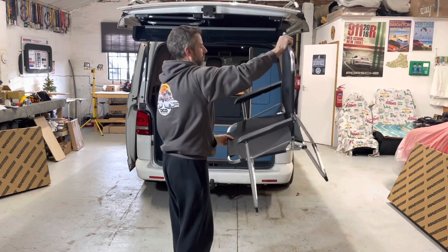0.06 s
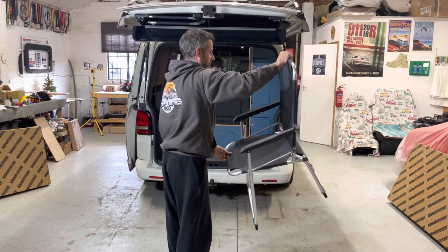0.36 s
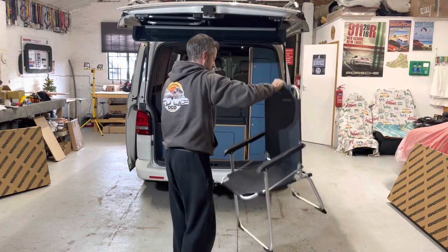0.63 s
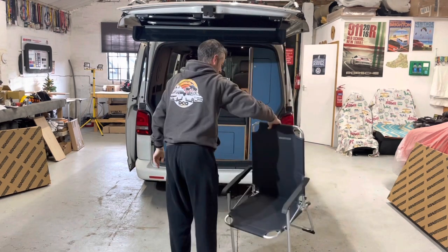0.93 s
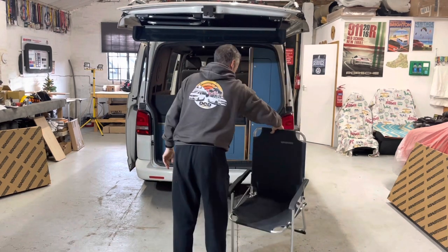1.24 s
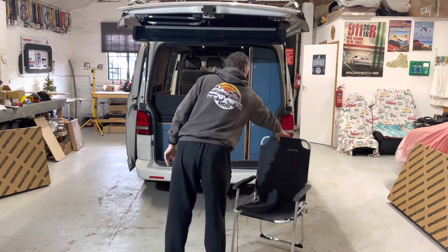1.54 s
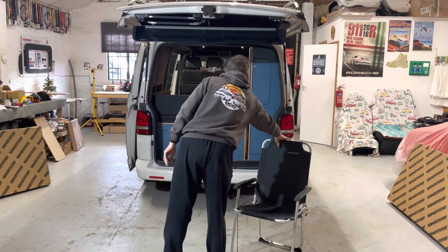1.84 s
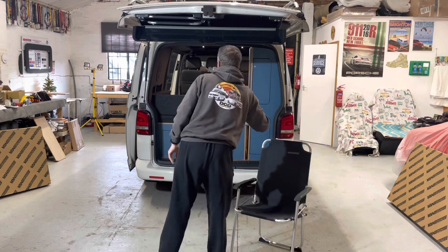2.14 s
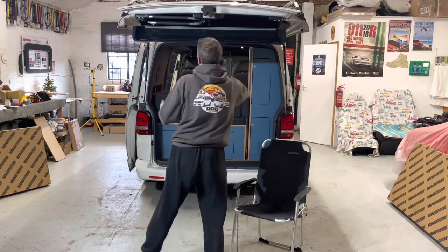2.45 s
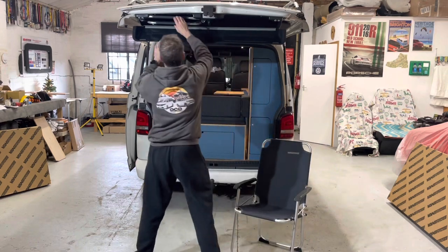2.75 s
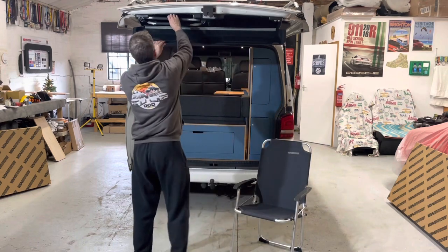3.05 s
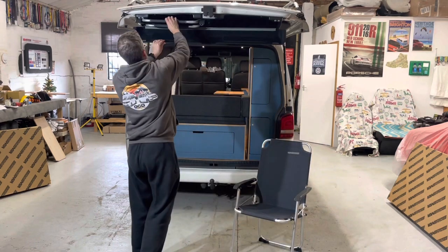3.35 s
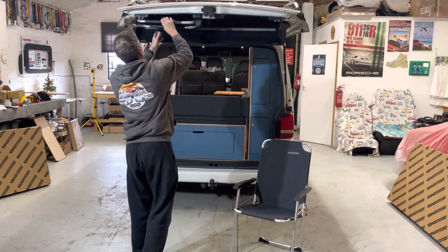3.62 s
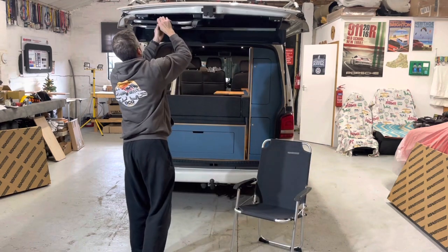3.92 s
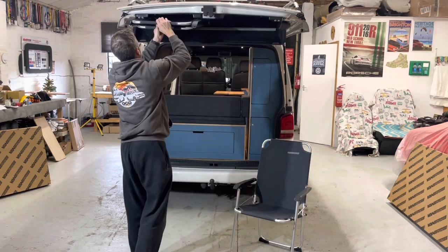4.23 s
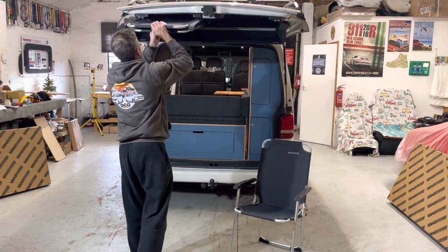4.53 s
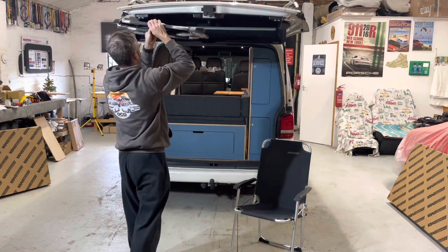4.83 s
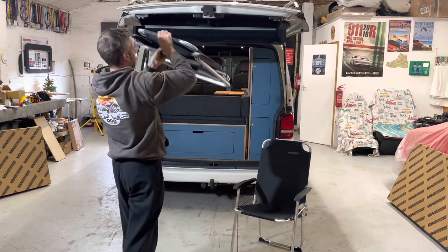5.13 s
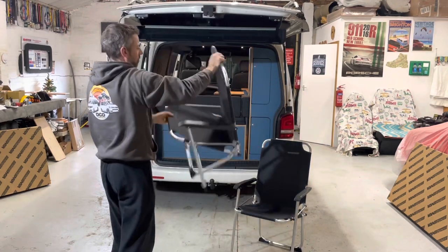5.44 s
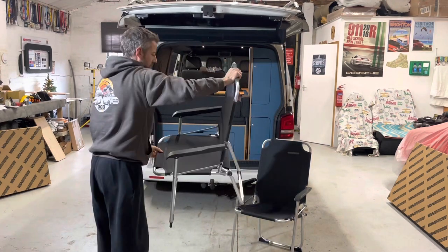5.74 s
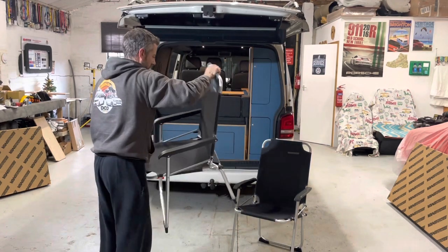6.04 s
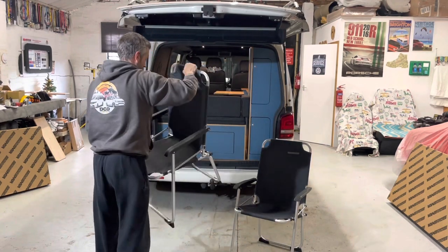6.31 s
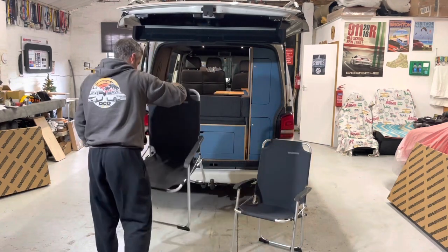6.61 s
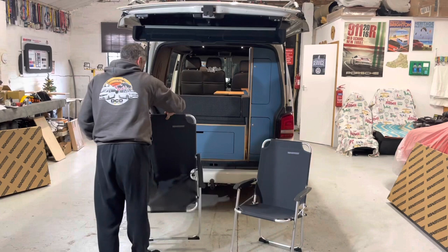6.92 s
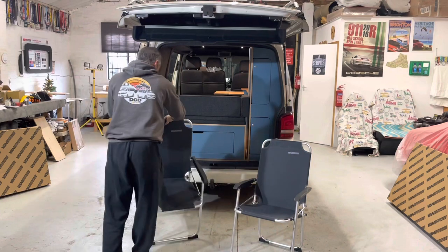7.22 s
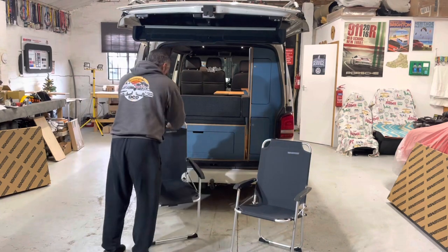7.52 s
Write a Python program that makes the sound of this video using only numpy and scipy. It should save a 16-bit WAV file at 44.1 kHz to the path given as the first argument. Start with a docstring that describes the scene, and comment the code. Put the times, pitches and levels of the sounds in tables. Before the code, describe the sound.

A folding aluminium chair snaps open with a sharp clatter and a deep boom, then its feet knock down on concrete. A second chair bumps, scrapes and briefly squeaks its way out of a hollow plastic pod, snaps open and is set down too. Cloth rustles faintly between the knocks. The microphone is fairly close, and the workshop echoes behind each blow over a low rumble.

```python
"""A sharp metal clatter and a deep boom in the room: a folding aluminium chair snaps open.
It is set down on the concrete floor of a workshop, at the back of a van. A second chair knocks, scrapes
and squeaks out of a hollow plastic pod on the tailgate, then snaps open and is set down too.
Cloth rustles, the room rings behind every blow, and a low rumble lies under it all."""
import sys
import numpy as np
from scipy import signal
from scipy.fft import rfft, irfft, next_fast_len
from scipy.io import wavfile
from scipy.ndimage import uniform_filter1d, map_coordinates

SR = 44100
rng = np.random.default_rng(int(sys.argv[2]) if len(sys.argv) > 2 else 0)


def persist_wave(psi):
    """Save psi, clipped to +-1, as 16-bit WAV."""
    counts = np.round(np.clip(psi, -1, 1) * 32767).astype(np.int16)
    wavfile.write(sys.argv[1], SR, np.atleast_2d(counts).T)


N = 333837

# A chair snaps open (weight adds bass, softness takes treble away, tilt brightens the boom):
# t/s, level/dB, weight/dB, softness/dB, frame f/Hz, frame boost/dB, boom level/dB, tilt/dB per octave
SNAPS = [(0.0165, 16.5, -8, 6, 760, -2, -19.5, 2.2), (5.676, 16.3, 5.5, 1.5, 480, 3, -11, -1.4)]
# Tone of a joint hitting its stop: f/Hz, level/dB
CLATTER_TONE = [(30, -8.5), (80, 6), (170, 15), (280, 10.5), (500, 5), (750, 1.5), (1200, 3), (1870, 0.5),
                (4770, -6), (11800, -5.5), (13400, -15), (16000, -12)]
# Low notes of the boom in the room as a chair snaps open (fade is the time to drop by 60 dB):
# f/Hz, level/dB, fade/s
BOOM_NOTES = [(62.8, -6, 0.85), (91.5, -1, 0.59), (123.7, 3, 0.17), (134, -6, 0.35), (172, -13.5, 0.14),
              (270, -6.5, 0.16)]
METAL_SOFT_HZ = 6700  # a soft touch on metal dulls the sound above this

def chair_snaps(swell_s=0.0236, lag_s=0.019, rise_s=0.005, clatter_s=0.014):
    """The joints clatter into their stops, then the seat pulls taut and a deep boom rings on."""
    out, t = np.zeros((2, N)), np.arange(SR) / SR
    for s, db, weight_db, soft_db, frame_hz, frame_db, boom_db, tilt_db in SNAPS:
        force = grains(6000, 2, count=len(t)) * (1 - np.exp(-(t / rise_s) ** 2)) * np.exp(-t / clatter_s)
        blow = contact(CLATTER_TONE, weight_db, soft_db, METAL_SOFT_HZ)
        blow = resonate(blow, frame_hz, frame_db, sharpness=6)
        blow = frame_ring(blow, ring_db=-19)
        add(out, s - rise_s, amp(db) * in_room(blow, room_db=-1, force=force))
        notes = [(hz, note_db + tilt_db * np.log2(hz / 100), fade) for hz, note_db, fade in BOOM_NOTES]
        boom = ring(notes, t) * (1 - np.exp(-(t / swell_s) ** 2))
        add(out, s + lag_s, amp(boom_db) * boom)
    return out

# The seat cloth whips taut and bounces back: t/s, level/dB, f/Hz
SEAT_SLAPS = [(0.035, -22, 150), (0.0485, -14, 130), (0.0735, -18, 150), (0.102, -22, 170),
              (5.7035, -15, 260), (5.7265, -15, 170), (5.7495, -9, 125)]

def seat_slaps(fade_cycles=1.1):
    """Each jerk of the seat cloth is a low whump, only a swing or two long."""
    out, t = np.zeros(N), np.arange(SR // 8) / SR
    for s, db, hz in SEAT_SLAPS:
        swell = 2 * (1 - np.exp(-2 * hz * t)) * np.exp(-hz * t / fade_cycles)
        add(out, s, amp(db) * swell * np.sin(2 * np.pi * hz * t))
    return in_room(out, room_db=-7, near_hz=50)

# Knocks of a chair's joints and feet: t/s, level/dB, weight/dB, softness/dB,
# seat f/Hz, frame f/Hz, tube f/Hz, tube boost/dB, echo level/dB, rattle time/s
FRAME_HITS = [(0.335, -14, -3, 8, 175, 900, 4500, 3, 1, .003),
              (1.0941, -17, -2, -4, 151, 520, 9500, 0, 3, .009),
              (1.1411, -3.5, -3, 2, 200, 540, 1400, 9, -2, .002),
              (1.1481, -4, 2, -3, 200, 410, 1600, 5, 0, .002),
              (1.163, -7, 6, 10, 140, 860, 2240, 7, 3, .006),
              (1.183, -10, 6, 10, 200, 530, 1620, 11, 3, .006),
              (1.3172, -3, 5, 12, 180, 535, 3800, 4, 0, .003),
              (1.393, -13, 8, 16, 150, 380, 4550, 5, 3, .008),
              (1.522, -14.5, 0, 3, 178, 540, 2600, 2, 2, .016),
              (1.6739, 2, 0, 4, 125, 260, 3800, -1, -3, .0011),
              (5.176, -21, 0.5, -14, 176, 540, 9500, 0, 1, .003),
              (5.455, -12, 1, -7, 270, 540, 3900, 0, 4, .01),
              (5.5871, -9, 3, 19, 275, 540, 2000, 3, 4, .005),
              (6.6112, -19, 2, 0, 269, 540, 5900, 0, 1, .002),
              (6.6662, -21, 1, -6, 250, 540, 5900, 0, 1, .003),
              (7.0364, -3, 10, 11, 178, 545, 1120, 4, 0, .003),
              (7.048, -12, 22, 8, 178, 560, 5950, 5, 4, .005),
              (7.085, -16, 22, 20, 110, 560, 2100, 4, 1, .005),
              (7.2462, -2.5, 5, 32, 178, 1600, 2400, 0, 1, .007),
              (7.3412, -15, 15, 0, 110, 1600, 5950, 6, 3, .009)]
# Tone of a hard knock on the frame: f/Hz, level/dB
CLACK_TONE = [(30, -3), (80, 16.5), (170, 14), (550, 6), (1000, 0.5), (1870, 1), (4770, -4), (11800, -7),
              (13400, -19)]

def frame_hits(seat_db=3, frame_db=3):
    """Joints click home, feet meet the concrete and legs rattle, ringing the seat, frame and tubes."""
    out = np.zeros((2, N))
    for s, db, weight_db, soft_db, seat_hz, frame_hz, tube_hz, tube_db, room_db, rattle_s in FRAME_HITS:
        blow = contact(CLACK_TONE, weight_db, soft_db, METAL_SOFT_HZ)
        blow = resonate(blow, seat_hz, seat_db, sharpness=8)
        blow = resonate(blow, frame_hz, frame_db, sharpness=13)
        blow = resonate(blow, tube_hz, tube_db, sharpness=7)
        blow = frame_ring(blow, ring_db=-18)
        add(out, s, amp(db) * in_room(blow, room_db, rattle(rattle_s, bounce_db=6)))
    return out

# Notes of the aluminium tubes: f/Hz, relative level/dB, fade/s
TUBE_NOTES = [(423, -4, 0.39), (466, -5, 0.29), (577.7, 2.5, 0.24), (1005, 1, 0.25), (1076, -1, 0.26),
              (1262, 1, 0.23), (1405, -1, 0.26), (1606, -4, 0.3), (1945, 1, 0.22), (2070, 1, 0.25),
              (2680, -3, 0.16), (3140, -1.5, 0.32), (3780, 0, 0.082), (5380, 3, 0.13)]

def frame_ring(blow, ring_db):
    """A blow plus the ring of the tubes, cut short by cloth and hands."""
    tubes = ring(TUBE_NOTES, np.arange(SR // 2) / SR)
    answer = amp(ring_db) * tubes / np.linalg.norm(tubes)
    answer[0] += 1  # lets the blow itself through
    return signal.fftconvolve(blow, answer)

# Clicks of the pod's catches and bumps on its shell:
# t/s, level/dB, weight/dB, softness/dB, struck spot f/Hz, spot boost/dB, echo level/dB, rattle time/s
POD_HITS = [(2.6546, -14, -12, -2, 5000, 2, -2, .0015), (3.0111, -16, -8, -23, 165, 0, 1, .004),
            (3.0282, -6.5, 16, 22, 235, 7, 1, .005), (3.055, -16, 24, 30, 145, 14, 1, .006),
            (3.1295, 3, -2, 21, 390, 6, 1, .005), (3.172, -22, 17, 25, 135, 17, 1, .005),
            (3.2088, -2, -2, 6, 446, 10, 2, .005), (3.283, 2, 0, 4, 700, 5, 0, .002),
            (3.2885, 9.5, 1, 4, 468, 13, 1, .003), (3.301, 4, 3, 10, 700, 8, 0, .005),
            (3.307, -4, 11, 20, 252, 18, 0, .004), (3.319, 6, -5, 10, 2680, 3, 0, .003),
            (3.338, -1, 11, 18, 245, 15, 0, .005), (3.361, 1, 4, 14, 385, 11, 0, .003),
            (3.376, -6, 10, 22, 240, 17, 0, .004), (3.402, -16, 16, 25, 135, 18, 0, .005),
            (3.563, 11, -5, 21, 400, 6, 1, .009), (3.596, 6, 0, 24, 512, 14, 0, .005),
            (3.606, -8, 19, 25, 120, 13, 0, .005), (3.647, 0, 3, 30, 505, 12, 0, .005),
            (3.672, -7, 0, 30, 390, 13, 1, .006), (4.4664, -12, -2, -16, 308, 4, 1, .004),
            (4.543, -7, 19, 25, 125, 13, 0, .005), (4.563, 7, -2, 7, 1200, 3, 1, .007),
            (4.6028, 5, -2, -1, 357, 4, 1, .008), (4.617, 1, 8, 14, 205, 13, 0, .003),
            (4.6694, 4, 10, 11, 285, 13, 0, .004), (4.693, 0, 12, 30, 512, 12, -1, .003),
            (4.727, 12, -2, 10, 1350, 3, 1, .006), (4.733, 0, 4, 25, 470, 13, 0, .005),
            (4.755, -4, 20, 30, 125, 12, -1, .004)]
# Tone of a hard knock on plastic: f/Hz, level/dB
KNOCK_TONE = [(30, -3), (80, 9), (190, 13.5), (500, 8.5), (1100, 3.5), (2500, -1.5), (4770, -10),
              (11800, -15), (13400, -28)]

def pod_hits():
    """Catches click and the folded chair bumps the pod's walls, which faintly rings its tubes."""
    out = np.zeros((2, N))
    for s, db, weight_db, soft_db, spot_hz, spot_db, room_db, rattle_s in POD_HITS:
        blow = contact(KNOCK_TONE, weight_db, soft_db, soft_hz=4700)
        blow = resonate(blow, spot_hz, spot_db, sharpness=14)
        blow = frame_ring(pod_shell(blow), ring_db=-20)
        add(out, s, amp(db) * in_room(blow, room_db, rattle(rattle_s, bounce_db=9)))
    return out

# Pulls that slide the chair along the pod: start t/s, end t/s, first level/dB, last level/dB,
# judder over rub/dB, rasp over rub/dB, shell f/Hz, shell boost/dB, tube f/Hz, tube boost/dB
PULLS = [(3.10, 3.275, -44, -39.5, -2, -17, 445, 2, 750, -6),
         (3.27, 3.40, -32, -34, -3, -17, 480, 0, 980, -4),
         (3.40, 3.55, -41, -34, -3, -19, 470, 3, 1000, -5),
         (3.545, 3.64, -27, -31, -4, -13, 505, 0, 1200, 0),
         (4.08, 4.27, -39, -31.5, -3, -14, 455, 3, 1120, 2.5),
         (4.24, 4.46, -38, -33, -4, -13, 430, -2, 1100, -3),
         (4.41, 4.54, -34, -30.5, 0, -16, 280, 1, 1300, -5),
         (4.52, 4.71, -30, -27.5, 2, -15, 100, 3, 1050, -6)]
# Tones of a scrape's low judder, middle rub and high rasp: f/Hz, level/dB
JUDDER_TONE = [(25, -20), (60, 4), (120, 11), (240, 5), (340, 1), (700, -40)]
RUB_TONE = [(70, -25), (150, -5), (290, 5), (480, 5), (620, 1), (820, -1), (1100, -4.5), (1600, -9),
            (2600, -30), (6000, -58)]
RASP_TONE = [(700, -15), (1700, 2), (2700, -4), (4000, -12), (6000, -13.5), (11000, -20.5), (13500, -40),
             (16000, -37)]

def pod_scrapes():
    """Tubes stick and slip on plastic: big slips shake the shell, tiny ones rasp."""
    grip = amp(2 * wobble(35))  # louder where the chair jams
    judder = unit(pod_shell(coloured(grip * grains(130, 4.3), JUDDER_TONE)))
    rub = unit(pod_shell(coloured(grip * grains(350, 3), RUB_TONE)))
    rasp = coloured(grip * grains(1500, 2.3), RASP_TONE)
    out = np.zeros(N)
    for *move, judder_db, rasp_db, shell_hz, shell_db, tube_hz, tube_db in PULLS:
        scrape = stroke(*move, attack_s=0.09) * (rub + amp(judder_db) * judder + amp(rasp_db) * rasp)
        scrape = resonate(scrape, shell_hz, shell_db, sharpness=14)
        out += resonate(scrape, tube_hz, tube_db, sharpness=9)
    return moving_in_room(out, room_db=0.5)

# Notes of the hollow pod: f/Hz, width/Hz, level/dB
POD_NOTES = [(132, 26, -5), (165, 18, -8), (210, 26, -2), (275, 36, -4), (372, 22, 0), (447, 20, 1),
             (512, 18, 2.5), (675, 80, -5), (790, 70, -8), (1004, 60, -7), (1085, 50, -7)]

def pod_shell(x, plain=0.71):
    """The shell passes on a plain share of every pitch and boosts its own notes."""
    return filtered(x, lambda hz: plain + sum(
        amp(db) * resonance(hz, centre, width) for centre, width, db in POD_NOTES))

# A tube squeaks in the pod, a foot stutters on the floor: t/s, length/s, first f/Hz, last f/Hz, level/dB
SQUEAKS = [(4.53, 0.11, 110, 205, -27), (4.61, 0.1, 195, 310, -25), (4.624, 0.04, 1000, 1005, -26.5),
           (7.245, 0.08, 185, 175, -29.5), (7.255, 0.15, 304, 299, -36.5)]

def squeaks(waver=0.015):
    """For a moment the slips come evenly and make a gliding, wavering pitch."""
    out = np.zeros(N)
    for s, length_s, first_hz, last_hz, db in SQUEAKS:
        count = int(length_s * SR)
        drift = unit(uniform_filter1d(rng.standard_normal(SR), size=200))[:count]
        pitch_hz = np.linspace(first_hz, last_hz, count) * (1 + waver * drift)
        phase = 2 * np.pi * np.cumsum(pitch_hz) / SR
        tone = unit(np.sin(phase) + 0.09 * np.sin(2 * phase))
        add(out, s, amp(db) * np.hanning(count) * tone)
    return in_room(out, room_db=-8, near_hz=110)

# Notes of a woody knock: f/Hz, relative level/dB, fade/s
TAP_NOTES = [(330, -8, 0.014), (640, 0, 0.013), (950, -1, 0.012), (1500, -6, 0.005), (2550, -3, 0.004),
             (3700, -14, 0.003)]

def woody_tap(at_s=2.5799, level_db=-22.5):
    """One dry knock close by: a few notes that die almost at once, and the room's answer."""
    out, t = np.zeros(N), np.arange(SR // 10) / SR
    knock = sum(amp(db - 60 * t / fade_s) * np.sin(2 * np.pi * hz * t) for hz, db, fade_s in TAP_NOTES)
    add(out, at_s, amp(level_db) * knock)
    return in_room(out, room_db=1.5)

# Swishes of seat cloth and sleeves: middle t/s, half length/s, level/dB
SWISHES = [(0.355, 0.057, -62.5), (0.717, 0.072, -68.5), (1.04, 0.073, -64.5), (1.47, 0.11, -60),
           (2.907, 0.13, -64.5), (3.924, 0.095, -56), (5.37, 0.091, -57), (6.174, .035, -60.5),
           (6.35, 0.095, -58.5), (6.937, 0.029, -57), (7.366, 0.065, -60)]
# Pushes that unfold the second chair: start t/s, end t/s, first level/dB, last level/dB
HINGE_PUSH = (5.29, 5.5, -44.5, -58)
GROAN_PUSH = (5.44, 5.61, -42.5, -34)
# Tones of the cloth, the hinges and the groaning frame: f/Hz, level/dB
RUSTLE_TONE = [(500, -21), (2000, 9.5), (5000, 0), (8000, 1), (11500, -2.5), (13500, -11), (16000, -1.5)]
HINGE_TONE = [(600, -9), (1800, -5), (5500, -16), (9000, -18), (16000, -34)]
GROAN_TONE = [(60, 0), (180, 4), (350, 0), (560, 0.5), (800, -8), (1200, -16), (2000, -19), (3500, -33)]

def cloth_and_hinges():
    """Showers of tiny slips: cloth rustles, and as a chair unfolds its hinges rub and its frame groans."""
    t = np.arange(N) / SR
    swishes = sum(amp(db) * np.exp(-((t - s) / half_s) ** 2) for s, half_s, db in SWISHES)
    rustle = swishes * coloured(grains(2700, 5.9), RUSTLE_TONE)
    groan = stroke(*GROAN_PUSH, attack_s=0.035) * coloured(grains(900, 3.5), GROAN_TONE)
    rub = stroke(*HINGE_PUSH, attack_s=0.035) * coloured(grains(1500, 2.2), HINGE_TONE)
    return in_room(rustle + groan + rub, room_db=3.0)

# How long the workshop echoes at each pitch: f/Hz, fade/s
ECHO_FADES = [(60, 1), (160, 0.47), (420, 0.58), (1100, 0.69), (2900, 0.69), (5500, 0.59), (8000, 0.49),
              (12000, 0.33), (16000, 0.48)]

def in_room(x, room_db, force=(1.,), near_hz=260):
    """x, set off by a force, arrives directly and as an echo; the echo carries most of the bass."""
    hz, t, noise = signal.stft(diffuse(SR), SR, nperseg=256)
    fade = amp(-60 * t / along(ECHO_FADES, hz)[:, None])
    echo = signal.istft(noise * fade, SR, nperseg=256)[1]
    force = np.pad(force, (0, echo.shape[1] - len(force))) / np.linalg.norm(force)
    echo *= np.sqrt(np.cumsum(force ** 2))  # the room fills as the bounces add their energy
    direct = signal.lfilter(*signal.butter(1, near_hz, "high", fs=SR), force)
    answer = direct + amp(room_db) * echo / np.linalg.norm(echo[0])
    return signal.fftconvolve(x[None], answer / np.linalg.norm(answer[0]), axes=1)[:, :N]

def moving_in_room(x, room_db):
    """A moving source stirs a different echo every quarter second."""
    out, hop = np.zeros((2, N)), SR // 4
    for start in range(0, N - 2 * hop, hop):
        part = x[start:start + 2 * hop] * np.hanning(2 * hop)
        if np.abs(part).max() > 1e-5:
            add(out, start / SR, in_room(np.pad(part, (0, SR)), room_db))
    return out

# Tone of the workshop's background noise: f/Hz, level/dB
RUMBLE_TONE = [(22, -31), (45, -9.5), (88, -2.5), (140, -11), (230, -12), (490, -15.5), (650, -19),
               (1000, -19), (1400, -27), (2200, -32.5), (3500, -37), (5500, -45.5), (8000, -52.5),
               (16000, -68.5)]

def room_rumble(level_db=-47.5):
    """A steady low rumble and faint hiss fill the room."""
    return amp(level_db) * coloured(diffuse(N), RUMBLE_TONE)

# How alike the room sounds on the left and right: f/Hz, likeness (1 = the same)
LIKENESS = [(150, 0.97), (260, 0.93), (500, 0.58), (1000, 0.092), (2300, 0.44), (3600, 0.18), (4700, 0.58),
            (5900, 0.2), (7000, 1), (8000, 0.99), (9300, 0.36), (10500, .99), (16000, 1)]

def diffuse(count):
    """Stereo noise as it arrives from all sides."""
    turn = lambda hz: np.arccos(np.clip(along(LIKENESS, hz), -1, 1)) / 2
    shares = lambda hz: np.array([np.cos(turn(hz)), np.sin(turn(hz))])
    mid, side = filtered(rng.standard_normal((2, count)), shares)
    return np.array([mid + side, mid - side])

def contact(tone, weight_db, soft_db, soft_hz, weight_hz=450, steepness=2.6):
    """One blow: mass behind it adds bass, a soft touch dulls it, a hard one (soft_db < 0) brightens it."""
    hz = np.geomspace(20, SR / 2, 120)
    bass = weight_db / (1 + (hz / weight_hz) ** 2)
    treble_loss = soft_db / (1 + (soft_hz / hz) ** steepness)
    return pulse(np.transpose([hz, along(tone, hz) + bass - treble_loss]))

def rattle(rattle_s, bounce_db, push_hz=700, rise_share=0.4, loose_s=0.005):
    """The force of one knock: a click, a single push in the bass and quick bounces above it."""
    t = np.arange(SR // 10) / SR
    swell = (1 - np.exp(-t / (rise_share * rattle_s))) * np.exp(-t / rattle_s)
    bounces = grains(7000, 3.5, count=len(t)) * swell
    bounces = signal.lfilter(*signal.butter(2, push_hz, "high", fs=SR), bounces)
    push = t * np.exp(-4 * np.pi * push_hz * t)
    click = np.exp(-rattle_s / loose_s)  # a long, loose rattle has hardly any first click
    force = amp(bounce_db) * bounces / (np.linalg.norm(bounces) + 1e-9)
    force += (0.68 * amp(bounce_db) + 1 - click) * push / push.sum()
    force[0] += click
    return force

def stroke(start_s, end_s, first_db, last_db, attack_s, release_s=0.05):
    """Loudness of one push: it sets in, moves steadily from its first to its last level, and fades."""
    t = np.arange(N) / SR
    rise = np.clip((t - start_s) / min(attack_s, (end_s - start_s) / 2), 0, 1)
    release = np.exp(-np.maximum(t - end_s, 0) / release_s)
    level = amp(np.interp(t, [start_s, end_s], [first_db, last_db]))
    return np.sin(np.pi / 2 * rise) ** 2 * release * level

def grains(per_second, spread_db, count=N):
    """Tiny slips or bounces of uneven size, at random moments."""
    chance, sign, size = rng.random(count), rng.standard_normal(count), rng.standard_normal(count)
    return (chance < per_second / SR) * np.sign(sign) * amp(spread_db * np.clip(size, -2, 2))

def ring(notes, t):
    """Fading notes, at slightly new strengths for every blow."""
    return sum(amp(db + rng.normal(0, 0.57) - 60 * t / fade_s) * np.sin(2 * np.pi * (hz * t + rng.random()))
               for hz, db, fade_s in notes)

def resonate(x, note_hz, boost_db, sharpness):
    """Each spot that is struck or rubbed favours one note."""
    return filtered(x, lambda hz: 1 + amp(boost_db) * resonance(hz, note_hz, note_hz / sharpness))

def resonance(hz, centre, width):
    """How a part with one note of its own answers each pitch: 1 at its centre, less to either side."""
    return 1j * hz * width / (centre ** 2 - hz ** 2 + 1j * hz * width)

def pulse(tone, size=8192):
    """A click with the given tone, its energy packed at the start (minimum phase)."""
    cepstrum = irfft(np.log(amp(along(tone, np.fft.rfftfreq(size, 1 / SR)))))
    cepstrum[1:size // 2] *= 2
    cepstrum[size // 2 + 1:] = 0
    return irfft(np.exp(rfft(cepstrum)))

def wobble(per_second):
    """A smooth curve through so many random points a second."""
    points = rng.standard_normal(int(N * per_second / SR) + 4)
    return map_coordinates(points, [np.arange(N) * per_second / SR])

def coloured(x, tone):
    """x shaped by a tone table, at standard strength."""
    return unit(filtered(x, lambda hz: amp(along(tone, hz))))

def filtered(x, response):
    """x with each frequency scaled and shifted by response(hz)."""
    n = x.shape[-1]
    padded = next_fast_len(n + SR // 4)
    return irfft(rfft(x, padded) * response(np.fft.rfftfreq(padded, 1 / SR)), padded)[..., :n]

def along(points, hz):
    """Read between the rows of a table of f/Hz, value, on a pitch (log) scale."""
    row_hz, values = np.transpose(points)
    return np.interp(np.log(hz + 1), np.log(row_hz + 1), values)

def add(track, s, sound):
    """Mix a sound into the track at s seconds."""
    start = max(round(s * SR), 0)
    part = sound[..., :N - start]
    track[..., start:start + part.shape[-1]] += part

def amp(db):
    """Decibels to gain."""
    return np.exp(np.asarray(db) * (np.log(10) / 20))

def unit(x):
    """x at standard strength (rms 1)."""
    return x / np.sqrt(np.mean(x ** 2) + 1e-20)

def scene():
    """Two chairs are unpacked over the workshop's low rumble."""
    rumble = room_rumble()
    return (chair_snaps() + seat_slaps() + woody_tap() + frame_hits()
            + pod_hits() + pod_scrapes() + squeaks() + cloth_and_hinges() + rumble)

# How far the wave at the left microphone runs ahead of the right: f/Hz, lead/radians
LEFT_LEAD = [(1500, 0), (3200, .6), (5400, 0), (6100, -2), (7000, -3.14), (7900, -3.2), (9200, -4.6),
             (10500, -6.25), (11500, -6.3), (12500, -6.9), (13300, -9.2), (16000, -9.5)]

def record(dry, top_hz=15900):
    """Two close microphones hear each pitch at slightly different times and levels, up to top_hz."""
    left_louder_db = [(250, -0.66), (600, 0.97), (1000, -0.25), (2500, 1.78), (5000, 1.9), (7000, 0.74)]
    left = lambda hz: amp(along(left_louder_db, hz) / 2) * np.exp(.5j * along(LEFT_LEAD, hz))
    return filtered(dry, lambda hz: np.array([left(hz), 1 / left(hz)]) * (hz < top_hz))

dry = scene()
out = record(dry)
persist_wave(out)
```